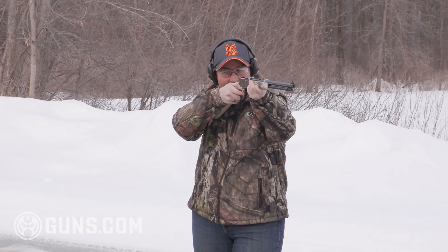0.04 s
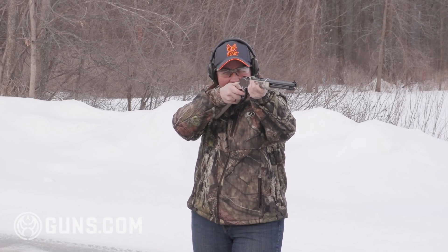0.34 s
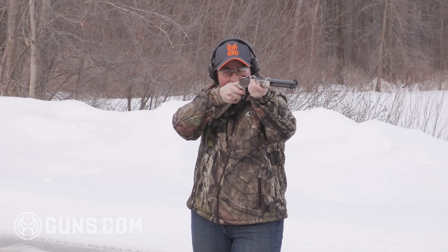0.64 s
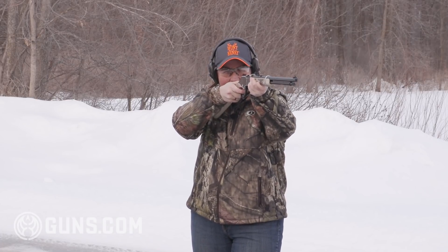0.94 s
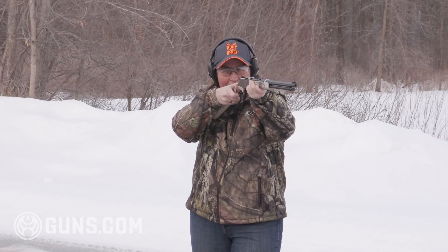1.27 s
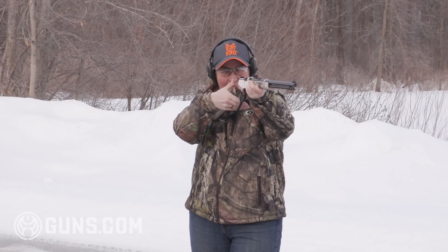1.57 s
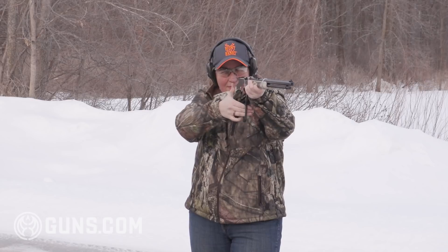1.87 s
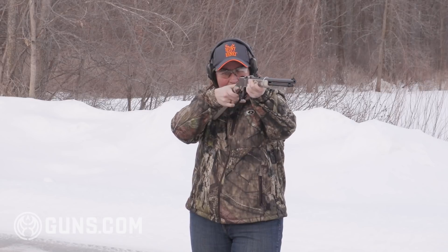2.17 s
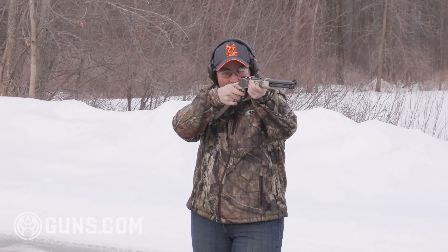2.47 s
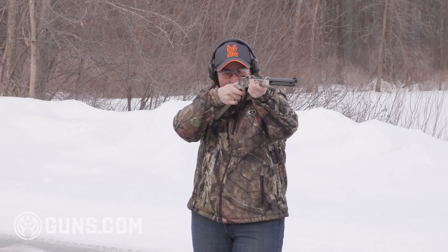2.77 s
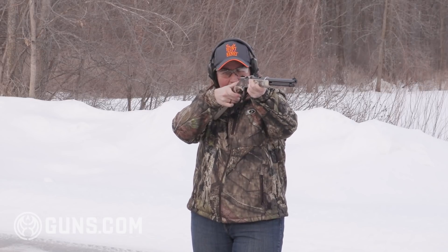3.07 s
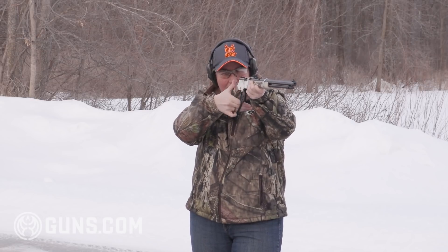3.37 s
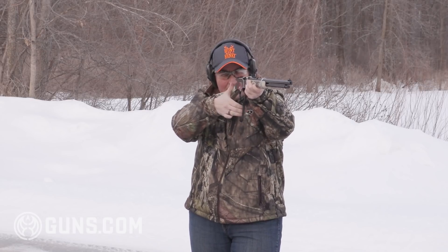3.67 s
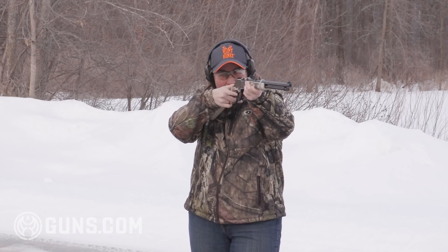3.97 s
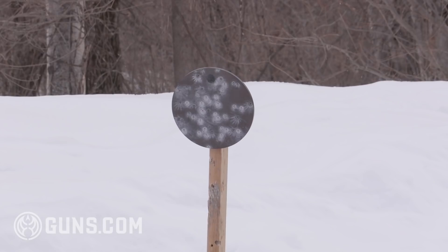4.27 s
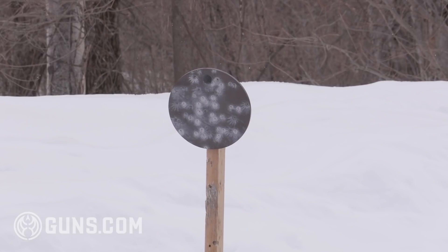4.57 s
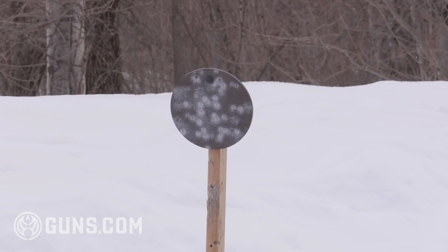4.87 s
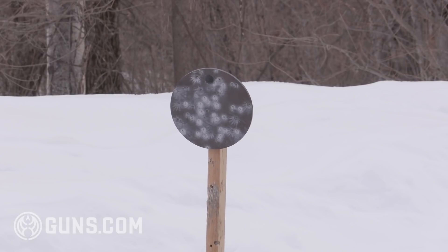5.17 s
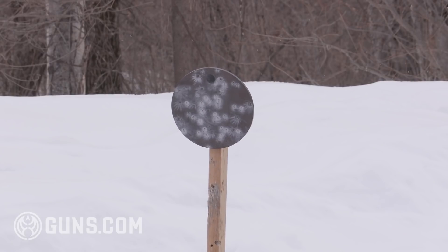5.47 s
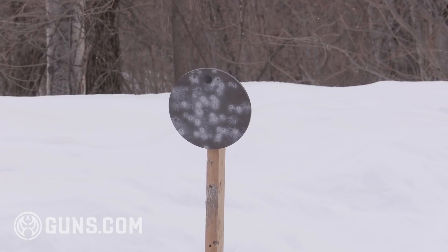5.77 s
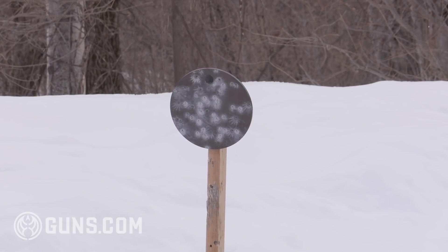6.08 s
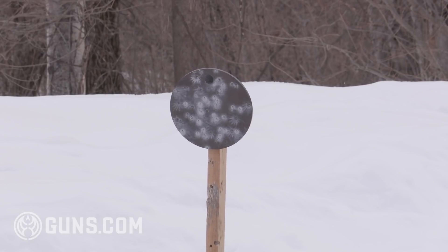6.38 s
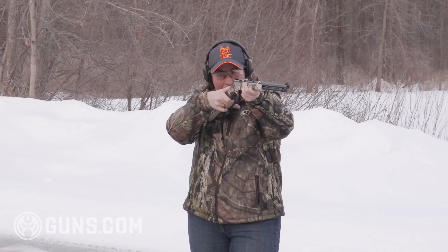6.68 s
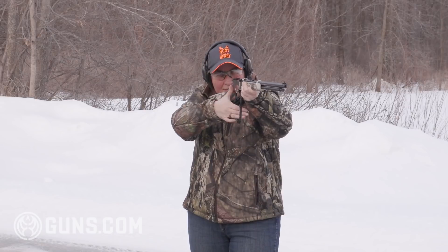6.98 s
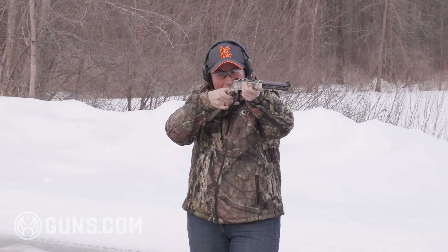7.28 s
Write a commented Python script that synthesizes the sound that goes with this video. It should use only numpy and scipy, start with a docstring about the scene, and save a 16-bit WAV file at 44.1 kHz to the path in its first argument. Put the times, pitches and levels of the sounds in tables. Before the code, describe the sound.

A small lever-action rifle fires five times at a steady pace outdoors. Each sharp crack overloads the close microphone and is followed almost at once by a bullet smacking and ringing a steel plate, while the report echoes back from the woods. After every shot the lever clatters open and snaps shut, with a faint sleeve rustle. The winter air is otherwise nearly silent.

```python
"""Five shots from a small lever-action rifle on a snowy range, in still winter air.
Each time the hammer falls and the muzzle blast overloads a close microphone.
The bullet rings a hanging steel plate, and the report rolls back from the woods; twice the plate
knocks on its hanger. Then the lever clatters open, the bolt slides, and the action snaps shut,
while the sleeve rustles and the stock bumps the shoulder."""
import sys
import numpy as np
from scipy import signal
from scipy.io import wavfile
from scipy.ndimage import uniform_filter1d

SR = 44100
rng = np.random.default_rng(int(sys.argv[2]) if len(sys.argv) > 2 else 0)


def unload_audio(sound):
    """Save the sound as a 16-bit wav file, at the path given as the first command line argument."""
    columns = np.transpose(np.atleast_2d(sound))
    # keep every value between -1 and 1, then stretch to whole-number steps
    steps = np.round(np.clip(columns, -1, 1) * 32767)
    wavfile.write(sys.argv[1], SR, steps.astype(np.int16))


N = 327398

# Each row: report and hit times in seconds; report, splash and woods levels in dB;
# time in seconds and level in dB of the dull echo from the snow bank.
SHOTS = [(0.9257, 1.0162, 3, 0, 0, .9965, -11.5), (2.801, 2.892, 3, 0.5, 1, 2.872, -14),
         (4.154, 4.2242, 2, 2, -0.5, 4.2165, -8.5), (5.3223, 5.391, 2.5, 2.5, -1, 5.385, -7),
         (6.424, 6.493, 3, 1.5, -.5, 6.486, -7)]
# Each row: times in seconds at which the bolt unlocks, hammer cocks, case ejects, carrier lifts
# and lever stops; stop force, scrape and sleeve levels in dB.
OPENINGS = [(1.6449, 1.6649, 1.703, 1.7153, 1.729, -2, -31, -63),
            (3.4351, 3.4666, 3.5073, 3.5185, 3.5287, 1, -32.5, -55),
            (4.5807, 4.5965, 4.6245, 4.6336, 4.6444, 1.5, -25.5, -54),
            (5.7307, 5.7523, 5.7853, 5.795, 5.8044, 4, -29, -52),
            (6.8387, 6.8632, 6.9196, 6.937, 6.9624, -6, -33, -63)]
# Each row: times in seconds at which the bolt starts, the round meets the ramp, enters the chamber
# and seats, and the action locks; chamber force, lock force, scrape and sleeve levels in dB.
CLOSINGS = [(2.0153, 2.0354, 2.0467, 2.0771, 2.0862, 2, 0, -25.5, -56.5),
            (3.757, 3.7787, 3.7884, 3.8271, 3.8366, 2, 1.5, -29, -58.5),
            (4.797, 4.8344, 4.8798, 4.9008, 5.0068, 0, -2.5, -33, -68),
            (5.9471, 5.982, 6.0036, 6.0236, 6.0364, -7, 1, -28, -64),
            (7.0986, 7.1374, 7.1546, 7.1852, 7.1943, 5, -.5, -28, -58)]


def reports():
    """The hammer falls, gas and pressure fronts leave the muzzle, and the surroundings hiss briefly."""
    # Each row: delay in seconds, level in dB, length in seconds.
    gas_bursts = [(0, -6.5, 0.009), (.0025, -5, .004), (0.0093, -7.5, .005), (0.0398, -21, 0.0046)]
    fronts = [(.0052, -3.5, 0.0018), (0.0122, -3, .0006)]
    # Each row: frequency in Hz, relative level in dB.
    gas_spectrum = [(40, -7.5), (300, 4), (650, 1), (900, -4.5), (1300, -1.5), (2200, -7), (4000, -12),
                    (7000, -14), (13000, -13), (16000, -13)]
    # Each row: frequency in Hz, relative level in dB, t60 in seconds.
    near_bands = [(40, 18, 0.2), (150, 1.5, 0.15), (300, 1, 0.11), (600, 2.5, 0.36), (1200, -11, 0.51),
                  (2550, -2, .3), (3600, 3, 0.2), (6000, -7, 0.27), (9500, 0.5, 0.2), (16000, -9, 0.34)]
    gas, hammer, out = np.zeros((3, N))
    t = clock(.1)
    boom = swell(.0065) * np.sin(2 * np.pi * 97 * t)  # of the gas cloud
    for s, _, db, *_ in SHOTS:
        add(hammer, s - .0102, puff(db - 30.5, .017, edge=.2))
        for delay_s, gas_db, length_s in gas_bursts:
            add(gas, s + delay_s, puff(db + gas_db, length_s))
        for delay_s, front_db, length_s in fronts:
            add(out, s + delay_s, amp(db + front_db) * (1 - t / length_s) * np.exp(-t / length_s))
        add(out, s + .0019, amp(db - 12.5) * boom)
        add(out, s + .0115, amp(db - 14) * tail(near_bands, rise_s=.0042, patchy_db=3.5))
    return out + colour(gas, gas_spectrum) + rasp(hammer)


def target():
    """Lead splashes on the plate, which thuds and rings; where it lands sets each mode's strength."""
    # Each row: frequency in Hz, t60 in seconds, level in dB at each of the five hits.
    plate_modes = [(1288, .48, -14, -12, -37, -10, -15), (1298, .65, -28, -22, -42, -18, -28),
                   (2888, .85, -24, -42, -40, -35, -44), (4895, .9, -36, -39, -40, -37, -39),
                   (7235, .9, -42, -50, -42, -48, -37), (8192, .75, -36, -42, -37, -32, -46),
                   (9840, .55, -46, -47, -33, -57, -44), (11298, .4, -16, -35, -26, -23, -19),
                   (14666, .35, -18, -15, -22, -26, -17), (15574, .52, -36, -21, -27, -21, -23)]
    # Each row: frequency in Hz, relative level in dB.
    splash_spectrum = [(40, -18), (300, -2), (800, 4), (1400, 0.5), (2500, -2.5), (5000, -7), (8000, -8.5),
                       (12000, 1.5), (16000, -14.5)]
    # Each row: frequency in Hz, relative level in dB, t60 in seconds.
    spray_bands = [(100, -8.5, .3), (600, 3.5, 0.52), (1500, 2.5, 0.56), (2980, 1.5, .75),
                   (5000, -4.5, .75), (6700, -7, .7), (11400, 1.5, 0.57), (16000, -12.5, .5)]
    splash, out = np.zeros((2, N))
    for hit, (_, s, _, db, *_) in enumerate(SHOTS):
        add(splash, s, burst(db - 6.5, peak_s=.00052))
        add(splash, s, burst(db - 9.5, peak_s=.0045))
        add(out, s + .004, thud(db - 10, hz=42, decay_s=.016))
        add(out, s, struck(plate_modes, blow=hit))
        add(out, s, amp(db - 22) * tail(spray_bands, rise_s=.0024, patchy_db=4))
    return out + colour(splash, splash_spectrum)


def woods():
    """The report returns as single echoes, crackle and scatter from many trunks, and a faint far roll."""
    # Banks and trunks. Each row: delay after the hit in seconds, level in dB, swell in seconds.
    echoes = [(0.0484, -7.5, 0.0021), (.066, -11.5, 0.0028), (.1, -17, 0.003), (.114, -19, 0.0041),
              (.145, -18, .003), (.203, -20, 0.0027)]
    # Each row: frequency in Hz, relative level in dB.
    echo_spectrum = [(100, -27), (300, -7.5), (550, 4.5), (1000, -2.5), (1800, 1), (2800, -4), (4500, -17),
                     (9000, -20.5), (16000, -26)]
    # Each row: frequency in Hz, relative level in dB, t60 in seconds.
    woods_bands = [(60, -20, 1.2), (200, -24, 0.76), (384, 3.5, 0.58), (605, 5.5, 1.15), (990, -2.5, .95),
                   (1500, 1.5, 0.96), (2380, 4, 0.67), (3780, -12.5, 0.56), (6000, -18, 0.41),
                   (16000, -33, .5)]
    far_bands = [(30, 4.5, 4), (120, -4.5, 4), (300, -5.5, 2.9), (700, 1.5, 2.64), (1500, -1.5, 2.21),
                 (2520, -2.5, 1.71), (4500, -14.5, 0.72), (16000, -38.5, 1.2)]
    crackle_t60_s = .72
    bank_echo = swell(.0025) * np.sin(2 * np.pi * 520 * clock(.1))
    slaps, trunks, out = np.zeros((3, N))
    for _, hit_s, _, _, db, bank_s, bank_db in SHOTS:
        for delay_s, echo_db, peak_s in echoes:
            add(slaps, hit_s + delay_s, burst(db + echo_db, peak_s))
        crackle = grains(per_s=110, spread_db=3)
        add(trunks, hit_s + .1, amp(db - 22 - 60 * clock(1) / crackle_t60_s) * crackle)
        add(out, hit_s + .06, amp(db - 20) * tail(woods_bands, rise_s=.047, patchy_db=3.5))
        add(out, hit_s + .091, amp(db - 33.5) * tail(far_bands, rise_s=.18, patchy_db=1))
        add(out, bank_s, amp(bank_db) * bank_echo)
    return out + colour(slaps, echo_spectrum) + colour(trunks, woods_bands)


def lever():
    """Steel parts click, the bolt scrapes, and both sound the hollow stock."""
    # Each row: frequency in Hz, relative level in dB.
    steel_spectrum = [(200, -24.5), (1200, -7.5), (2500, 4.5), (4000, -1), (6000, 1), (9000, -1.5),
                      (13000, -4), (16000, -9.5)]
    stock_spectrum = [(30, 1.5), (120, 3.5), (300, -3.5), (520, -7.5), (720, 1), (950, -2.5), (1400, -3),
                      (2200, -12), (4000, -25), (16000, -39.5)]
    # Each row: frequency in Hz, relative level in dB, t60 in seconds.
    cavity_modes = [(704, 6, 0.051), (930, -12.5, 0.01), (1240, -12.5, 0.0083)]
    scrape = bolt_friction()
    steel_power, stock_power = np.zeros((2, N))
    for s, steel_db, stock_db, peak_s in contacts():
        add(steel_power, s, (amp(steel_db) * swell(peak_s)) ** 2)
        add(stock_power, s, (amp(stock_db) * swell(1.4 * peak_s)) ** 2)
    steel, stock = np.sqrt([steel_power, stock_power]) * rng.standard_normal((2, N))
    knock = amp(-12) * convolve(stock + scrape, ring(cavity_modes))
    clatter = colour(steel, steel_spectrum) + colour(stock, stock_spectrum) + rasp(scrape) + knock
    t = clock(.5)
    scatter = rng.standard_normal(len(t)) * (np.exp(-t / .006) + amp(-28.5) * np.exp(-t / .05))
    return clatter + amp(-13) * convolve(clatter, scatter)  # off the shooter and the snow


def contacts():
    """Every click of handling, opening and closing, as (time s, steel dB, stock dB, swell s)."""
    # Each row: time in seconds, steel level in dB, stock level in dB.
    handling_ticks = [(1.587, -45, -29), (1.7978, -40.5, -45.5), (1.9625, -33, -27), (2.2246, -47, -47),
                      (2.416, -52, -45), (2.6768, -60, -57.5), (3.4079, -33, -24), (6.784, -35, -43),
                      (7.2929, -41.5, -28.5)]
    # A stroke's five contacts. Each row: steel level in dB, stock level in dB, swell in seconds.
    open_contacts = [(-16.5, -23, .0022), (-10, -13, .002), (-10, -12.5, .0021), (-9.5, -15.5, .0018),
                     (-14.5, -7.5, .0018)]
    close_contacts = [(-20, -25, .0016), (-14, -23, .0019), (-17, -21, .0018), (-15.5, -22, .0018),
                      (-7.5, -9, .0017)]
    tick_swell_s = .0016
    clicks = [(*tick, tick_swell_s) for tick in handling_ticks]
    for *times_s, stop_db, _, _ in OPENINGS:
        clicks += stroke(times_s, open_contacts, (0, 0, 0, 0, stop_db))
    for *times_s, chamber_db, lock_db, _, _ in CLOSINGS:
        start_s, _, _, seat_s, lock_s = times_s
        clicks += stroke(times_s, close_contacts, (0, 0, chamber_db, 0, lock_db))
        clicks += chatter(start_s, seat_s + .02)
        clicks.append((lock_s + .016, lock_db - 26, lock_db - 29, tick_swell_s))  # the parts settle
    return clicks


def stroke(times_s, parts, forces_db, rebound_s=.008):
    """The contacts of one lever swing, each with one weaker rebound."""
    clicks = []
    for s, (steel_db, stock_db, peak_s), db in zip(times_s, parts, forces_db):
        clicks.append((s, steel_db + db, stock_db + db, peak_s))
        clicks.append((s + rebound_s, steel_db + db - 14, stock_db + db - 8, peak_s))
    return clicks


def chatter(start_s, end_s, per_s=75, spread_db=3, peak_s=.0014):
    """Loose parts tick at uneven gaps while the bolt pushes the round."""
    times_s = start_s + np.cumsum(rng.random(40) + .5) / per_s
    sizes_db = spread_db * rng.standard_normal(40)
    return [(s, db - 27, db - 33, peak_s) for s, db in zip(times_s, sizes_db) if s < end_s]


def bolt_friction(lead_s=.012, overrun_s=.02, easy_db=-8):
    """The bolt sticks and slips back and forth, running easier once the round is in the chamber."""
    runs = [(unlock_s - lead_s, stop_s + overrun_s, db) for unlock_s, *_, stop_s, _, db, _ in OPENINGS]
    for start_s, _, chamber_s, seat_s, *_, db, _ in CLOSINGS:
        runs.append((start_s, chamber_s, db))
        runs.append((start_s - 2 * lead_s, seat_s + 2 * overrun_s, db + easy_db))
    scrape = np.zeros(N)
    for start_s, end_s, db in runs:
        slide = puff(db, end_s - start_s, edge=.3)
        grip_db = 3.9 * unit(uniform_filter1d(rng.standard_normal(SR), size=130))
        add(scrape, start_s, slide * amp(grip_db[:len(slide)]))
    return scrape


def rasp(noise):
    """Gives noise the tone of the moving hammer or bolt."""
    # Each row: frequency in Hz, relative level in dB.
    scrape_spectrum = [(30, 2), (150, 0), (450, -6), (720, 10.5), (1000, 7), (2200, -0.5), (4000, -4),
                       (8000, -16), (16000, -16.5)]
    return colour(noise, scrape_spectrum)


def receiver(delay_s=.0018):
    """Locking thuds and rings the receiver; each closing excites its modes differently."""
    # Each row: frequency in Hz, t60 in seconds, relative level in dB at each of the five closings.
    receiver_modes = [(2634, .13, -17, -23, -31, -23, -18), (3025, .19, -44, -43, -29, -36, -42),
                      (3290, .9, -66, -58, -69, -61, -60), (5393, .19, -55, -40, -33, -36, -52),
                      (6072, .13, -38, -38, -33, -42, -40), (7974, .2, -50, -44, -39, -45, -37),
                      (10128, .22, -47, -45, -48, -52, -47), (11764, .4, -57, -43, -53, -57, -42),
                      (12820, .22, -54, -54, -45, -46, -50)]
    out = np.zeros(N)
    for closing, (_, _, _, _, lock_s, *_) in enumerate(CLOSINGS):
        add(out, lock_s + delay_s, amp(-2) * struck(receiver_modes, blow=closing))
        add(out, lock_s + delay_s, thud(-13, hz=32.4, decay_s=.016))
    return out


def hanger(low_hz=2888, high_hz=8192, rise_s=.014):
    """The swinging plate knocks on its hanger and two of its modes swell again."""
    # Each row: time in seconds, low mode level in dB, high mode level in dB.
    knocks = [(2.927, -13.5, -20), (6.70, -31, -60)]
    out = np.zeros(N)
    onset = 1 - np.exp(-clock(1) / rise_s)
    for s, low_db, high_db in knocks:
        add(out, s, onset * ring([(low_hz, low_db, .68), (high_hz, high_db, .55)]))
    return out


def jacket():
    """The sleeve rustles after each stroke; arm and stock bump the body."""
    # Each row: time in seconds, level in dB.
    bumps = [(1.423, -39), (3.16, -35.5), (3.219, -39), (3.67, -41), (6.13, -41), (7.298, -37), (7.33, -39)]
    # Each row: frequency in Hz, relative level in dB.
    cloth_spectrum = [(40, 16.5), (150, 18), (400, 6.5), (1500, -1), (4000, -5.5), (9000, -8), (14000, -5),
                      (16000, -7)]
    bump_spectrum = [(30, -6.5), (110, 0), (220, -4.5), (450, -20), (1500, -42), (16000, -65)]
    rustle, thumps = np.zeros((2, N))
    for _, _, _, _, end_s, *_, sleeve_db in OPENINGS + CLOSINGS:
        add(rustle, end_s + .015, puff(sleeve_db, length_s=.22, edge=.86))
    # The lever's stop jolts the stock against the shoulder.
    jolts = [(stop_s + .014, -32) for _, _, _, _, stop_s, *_ in OPENINGS]
    for s, db in bumps + jolts:
        add(thumps, s, burst(db, peak_s=.0081))
    return colour(rustle, cloth_spectrum) + colour(thumps, bump_spectrum)


def winter_air(rms_db=-62.5):
    """Still air: a faint, steady, low noise."""
    # Each row: frequency in Hz, relative level in dB.
    air_spectrum = [(25, -1.5), (70, -0.5), (120, 2.5), (190, -8.5), (330, -3), (550, -16), (1000, -20.5),
                    (2000, -26.5), (6000, -30), (11000, -27.5), (16000, -34.5)]
    return amp(rms_db) * unit(colour(rng.standard_normal(N), air_spectrum))


def tail(bands, rise_s, patchy_db):
    """Scattered sound: noise in uneven patches, each band dying at its own speed."""
    frames = dict(fs=SR, nperseg=256, noverlap=192, nfft=1024)
    hz, t, noise = signal.stft(rng.standard_normal(3 * SR), **frames)
    start_gain = unit(amp(read(bands, hz)))[:, None]
    decay_db = -60 * t / read(bands, hz, column=2)[:, None]
    patches = uniform_filter1d(rng.standard_normal(noise.shape), size=40, axis=0)
    patches = unit(uniform_filter1d(patches, size=4, axis=1))
    x = signal.istft(noise * start_gain * amp(decay_db + patchy_db * patches), **frames)[1]
    onset = 1 - np.exp(-(np.arange(len(x)) / SR / rise_s) ** 2)
    return x * onset


def struck(modes, blow):
    """The ring of one blow, from rows (Hz, t60 s, dB at each blow)."""
    return ring([(hz, blows_db[blow], t60_s) for hz, t60_s, *blows_db in modes])


def ring(modes):
    """Decaying sines from rows (Hz, dB, t60 s)."""
    t = clock(1)
    return sum(amp(db - 60 * t / t60_s) * np.sin(2 * np.pi * hz * t) for hz, db, t60_s in modes)


def thud(db, hz, decay_s):
    """A low, heavily damped push."""
    t = clock(.2)
    return amp(db) * np.cos(2 * np.pi * hz * t) * np.exp(-t / decay_s) * (1 - np.exp(-t / .0012))


def puff(db, length_s, edge=.34):
    """Held noise with soft edges."""
    count = len(clock(length_s))
    return amp(db) * signal.windows.tukey(count, edge) * rng.standard_normal(SR)[:count]


def burst(db, peak_s):
    """Noise that swells and dies."""
    return amp(db) * swell(peak_s) * rng.standard_normal(len(clock(.1)))


def grains(per_s, spread_db):
    """One second of sparse clicks of uneven size, rms 1."""
    size = amp(spread_db * np.minimum(rng.exponential(1, SR), 2.5))
    return unit(size * rng.choice([-1, 1], SR) * (rng.random(SR) < per_s / SR))


def swell(peak_s):
    """Envelope that reaches 1 at peak_s, then dies."""
    u = clock(.1) / peak_s
    return (u * np.exp(1 - u)) ** 2


def colour(x, spectrum, size=4096):
    """Minimum-phase filter with the shape of the spectrum."""
    log_gain = np.log(amp(read(spectrum, abs(np.fft.fftfreq(size, 1 / SR)))))
    response = np.exp(np.conj(signal.hilbert(log_gain)))
    return convolve(x, np.fft.ifft(response).real[:size // 2])


def convolve(x, taps):
    """Filters with the taps scaled to unit energy."""
    return signal.oaconvolve(x, taps / np.linalg.norm(taps))[:len(x)]


def read(points, hz, column=1):
    """Interpolates a column over log frequency."""
    points = np.asarray(points)
    return np.interp(np.log(hz + 1), np.log(points[:, 0]), points[:, column])


def add(mix, start_s, sound):
    part = mix[max(round(start_s * SR), 0):][:len(sound)]
    part += sound[:len(part)]


def amp(db):
    return 10 ** (np.asarray(db) / 20)


def clock(seconds):
    return np.arange(int(seconds * SR)) / SR


def unit(x):
    return x / np.sqrt(np.mean(x ** 2) + 1e-20)


def scene():
    """Mono mix; plate and echoes drop abruptly in level just after the last hit."""
    drop_s, drop_db, ramp_s = 6.712, -7, .0023
    drop = amp(drop_db * np.clip((np.arange(N) / SR - drop_s) / ramp_s, 0, 1))
    air = winter_air()
    downrange = (target() + woods()) * drop
    return (reports() + downrange + lever() + receiver() + hanger() + jacket() + air)[None]


def record(dry, clip_level=.95, cutoff_hz=16100):
    """The overloaded microphone clips the loudest peaks; a low-pass follows."""
    clipped = np.clip(dry, -clip_level, clip_level)
    lowpass = signal.firwin(255, cutoff_hz, window=("kaiser", 8), fs=SR)
    return signal.oaconvolve(clipped, lowpass[None], "same")


dry = scene()
out = record(dry)
unload_audio(out)
```